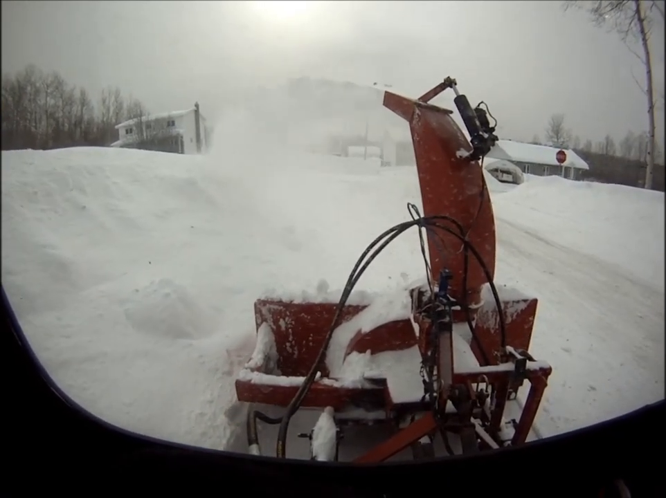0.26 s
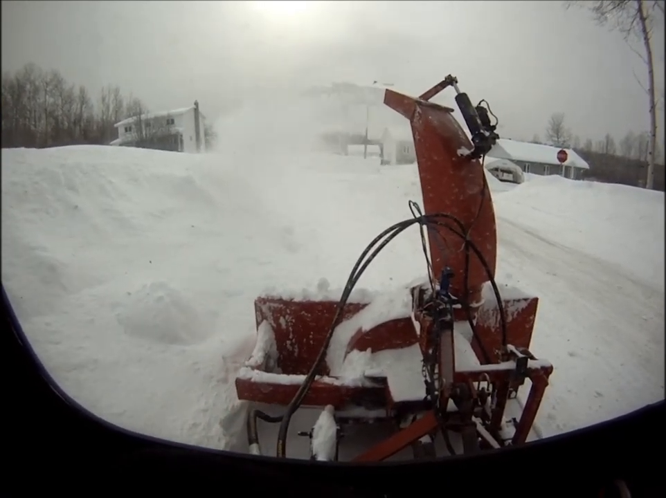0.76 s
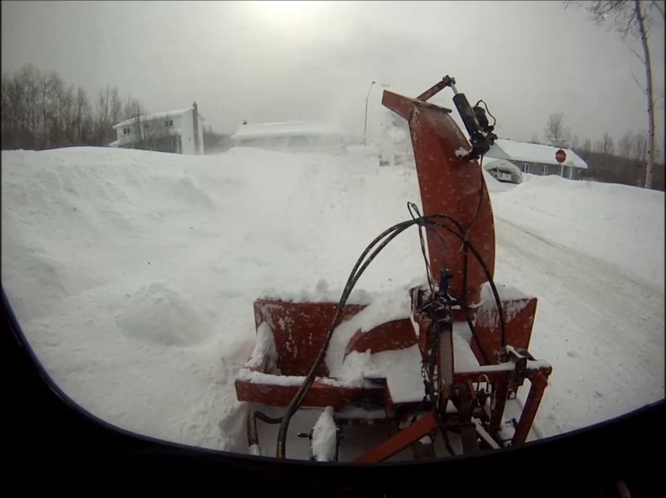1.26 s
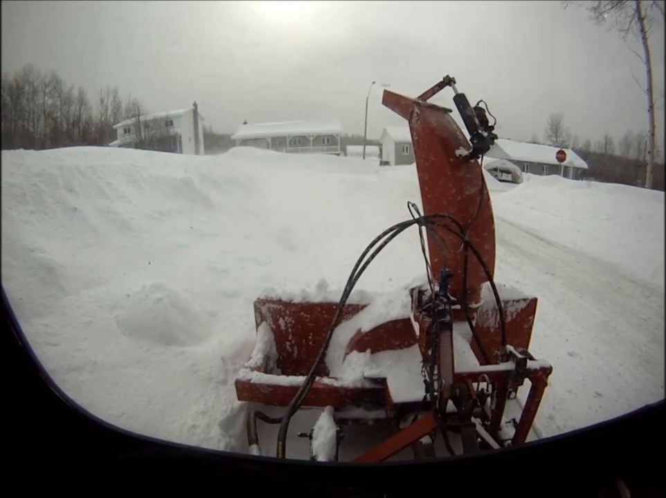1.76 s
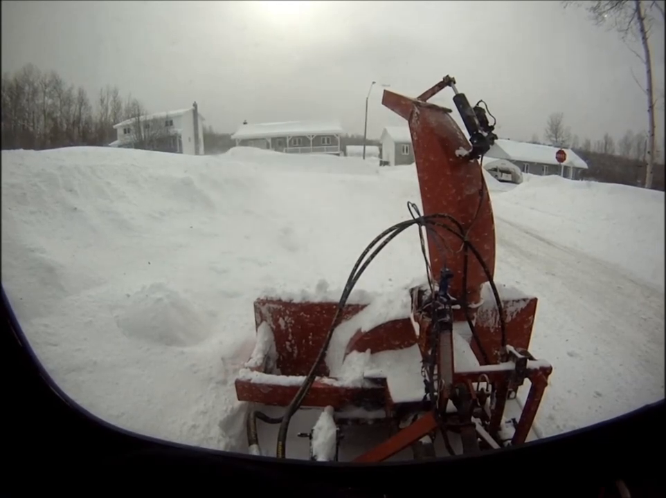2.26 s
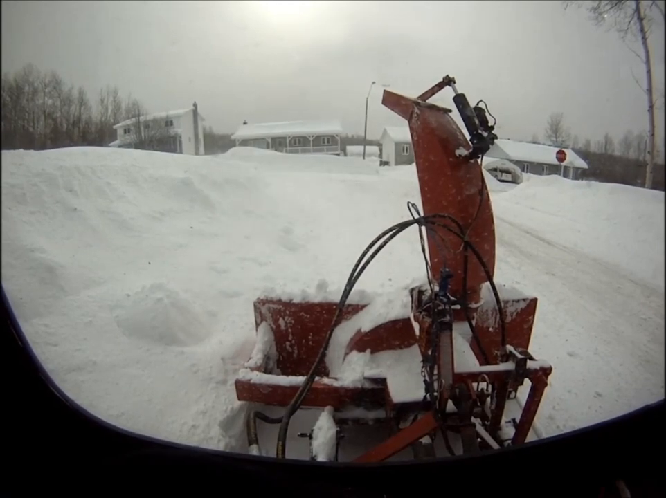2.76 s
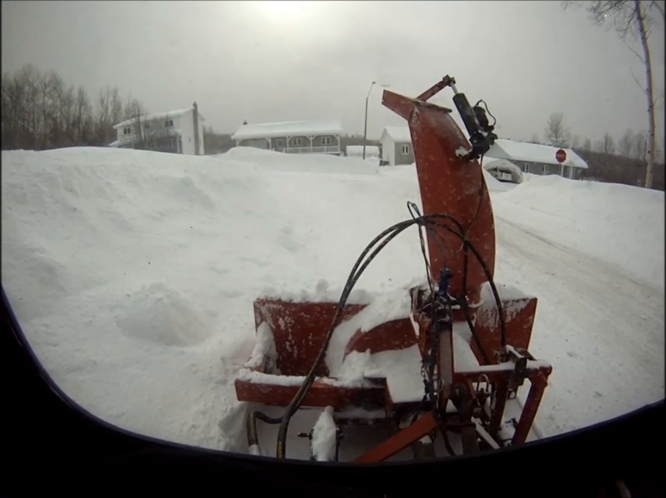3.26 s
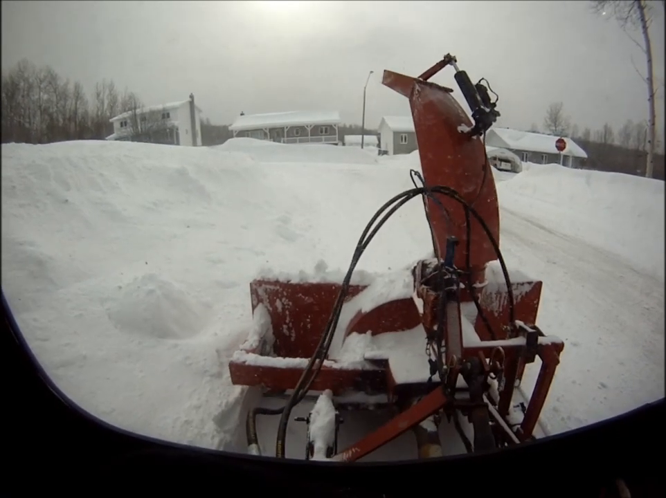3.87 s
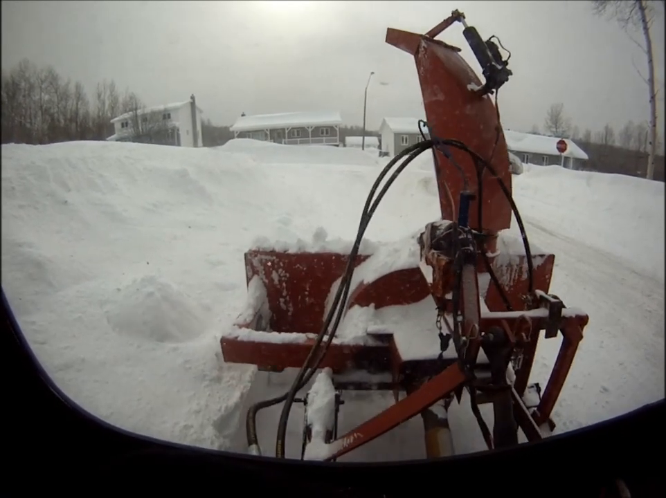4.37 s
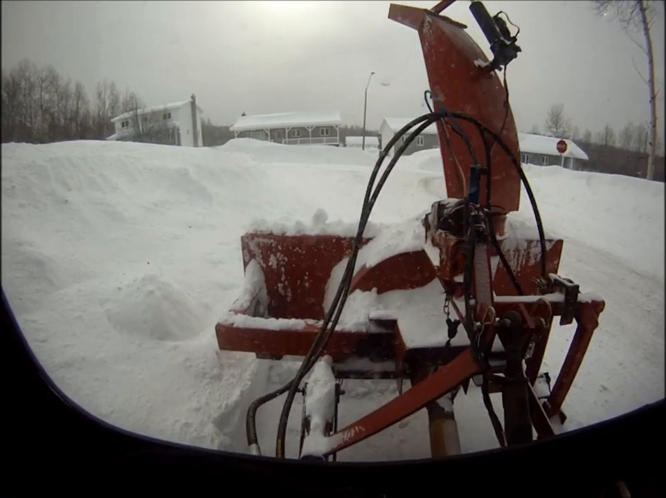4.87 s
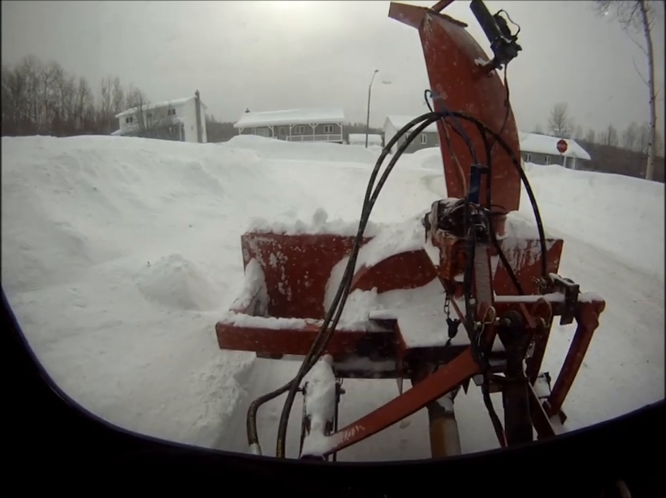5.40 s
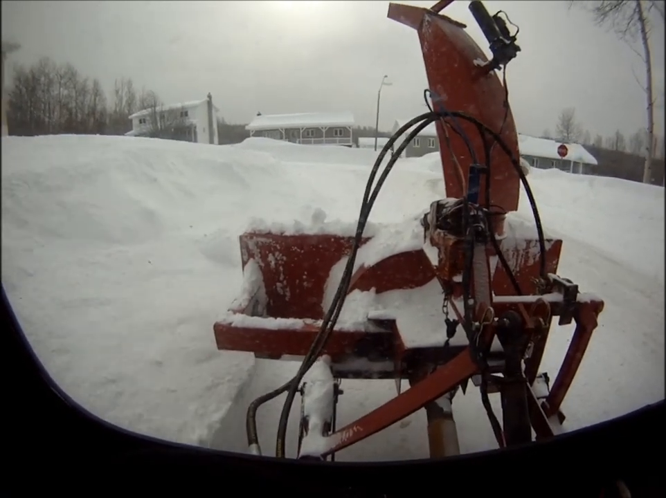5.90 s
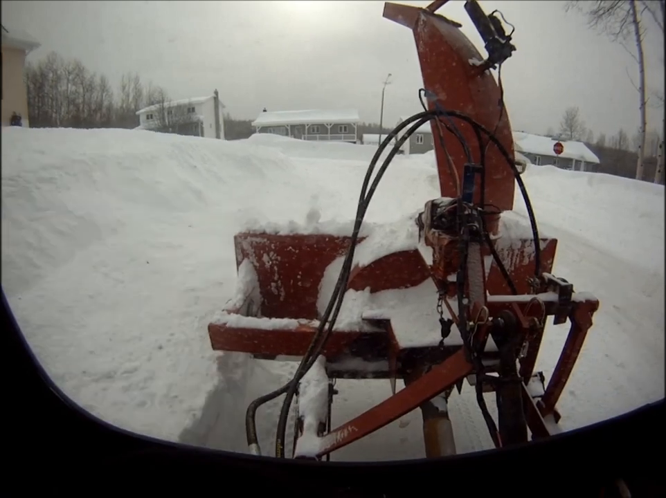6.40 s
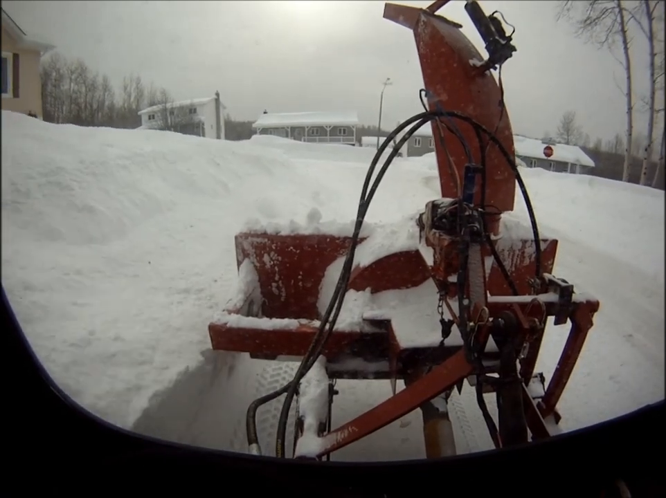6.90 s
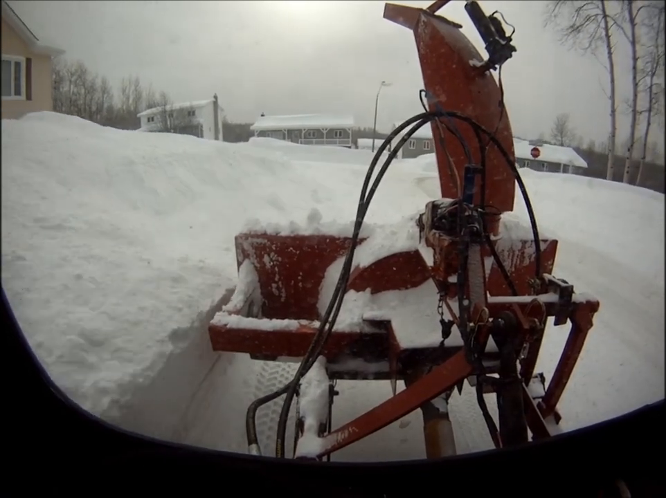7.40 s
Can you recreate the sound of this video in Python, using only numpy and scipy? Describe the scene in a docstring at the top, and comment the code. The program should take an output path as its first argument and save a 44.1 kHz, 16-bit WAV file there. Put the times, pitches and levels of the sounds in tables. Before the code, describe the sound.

Heard from the driver's seat of a compact three-cylinder diesel tractor with a snowblower, outdoors on a snowy street. At 0 s the engine throbs and knocks under a rough rumble and rattle as the auger throws its last snow, with brief whines; by 0.7 s this eases and the revs rise slightly. From 1 to 3.5 s it runs steadily, pump whining thinly, the housing drone swelling unevenly; a sharp double steel clank at 1.9 s, a faint tick at 2.8. From 3.5 to 4 s the pitch sags as the blower lifts, oil lines ringing; a jolt at 4.2. Around 4.9 to 5.4 s the engine lugs deepest, thumping and booming, with a wavering clutch squeal. At 5.5 to 5.7 s gears clash in a rough growl and bite into a bright whine, which settles and climbs with the revs, rolling steadily until 7.6 s. Close single microphone, gritty treble.

```python
"""On a snowy street, from the driver's seat of a three-cylinder compact diesel tractor working a snowblower.
The engine, built from sines at multiples of its cycle rate, throbs and knocks over the blower housing's drone.
It sags while the hydraulic pump lifts the blower; then the gears clash, bite and whine and the tractor rolls off.
Loose ironwork, noise bursts ringing steel, clanks once and ticks now and then. One microphone hears it all."""
import sys
import numpy as np
from scipy import signal
from scipy.fft import rfft, irfft, next_fast_len
from scipy.io import wavfile
from scipy.ndimage import uniform_filter1d

SR = 44100
rng = np.random.default_rng(int(sys.argv[2]) if len(sys.argv) > 2 else 0)


def pcm_store(signal):
    """Save signal as 16-bit PCM."""
    levels = np.round(np.clip(np.atleast_2d(signal), -1, 1) * 32767)
    wavfile.write(sys.argv[1], SR, levels.astype(np.int16).T)


N = 337365

# "Order" is a multiple of the four-stroke cycle rate; "turns" are turns of that cycle.
# crankshaft speed: (time [s], speed [rpm])
CRANK_SPEED = [(0.0, 2316), (0.26, 2303), (0.59, 2488), (0.83, 2507), (1.37, 2468), (2.38, 2507),
               (3.54, 2505), (3.94, 2335), (4.63, 2389), (5.17, 2172), (5.6, 2310), (5.75, 2442),
               (5.9, 2480), (6.1, 2556), (6.27, 2600), (6.65, 2586), (7.02, 2625), (7.65, 2631)]
# engine notes before the exhaust level: (order, standing [dB], lifting [dB], driving [dB])
ENGINE_ORDERS = [(4, -33.5, -40, -32.5), (5, -50, -36, -46), (6, -45, -39, -47), (7, -47, -47, -44),
                 (8, -30, -31, -39), (10, -29, -28, -30), (11, -46, -47, -36), (12, -32, -32, -29),
                 (13, -41, -37, -48), (14, -41, -40, -55), (15, -42, -44, -36), (16, -42, -46, -48),
                 (17, -43, -43, -48), (18, -43, -43, -40), (19, -48, -58, -45), (20, -50, -43, -45),
                 (24, -52, -47, -45), (25, -50, -50, -55), (26, -48, -51, -53), (27, -46, -44, -45),
                 (28, -50, -58, -50), (30, -52, -47, -48), (31, -45, -52, -44), (32, -47, -43, -50),
                 (33, -40, -39, -49), (34, -45, -40, -53), (36, -48, -44, -50)]
# boom at three times the firing rate: (time [s], level [dB])
BOOM_LEVEL = [(0, -56), (.45, -32.5), (3.1, -28.5), (4.0, -43), (4.45, -25.5), (4.8, -32.5), (5.0, -21),
              (5.4, -18.5), (5.72, -21.5), (5.9, -28.5), (7.65, -36)]

# blows of the firings: (place in cycle [turns], into side panel [dB], into injector pipes [dB])
CYLINDER_BLOWS = [(-.03, 2.5, 2.5), (.28, -1.5, -2), (.66, -12, 3.5)]
# what they ring, levels relative: (frequency [Hz], width [Hz], level [dB])
PANEL_MODES = [(1415, 34, -5), (1253, 90, -12.5)]
PIPE_MODES = [(2190, 87, 1), (2500, 120, -8), (2888, 50, -1.5), (3610, 120, 2)]
MOUNT_MODES = [(257, 44, 1), (366, 140, -6.5)]
# thump of the lugging engine on its mounts: (time [s], level [dB])
LUGGING_LEVEL = [(3.5, -60), (3.9, -38), (4.65, -45), (4.87, -27), (5.1, -36), (5.45, -47), (5.8, -67)]

# relative noise colour, low register to high: (frequency [Hz], density [dB per Hz])
RUMBLE_COLOUR = [(22, -25), (40, 2.5), (65, -4), (90, -2), (130, -10.5), (170, 0), (210, -1), (270, -3.5),
                 (340, -7.5), (420, -11), (500, -20.5)]
GROWL_COLOUR = [(440, -6), (540, -6.5), (600, -2), (660, -3), (710, 2), (780, -3), (860, -5.5),
                (920, -10.5), (1000, -14.5), (1100, -14)]
RATTLE_COLOUR = [(1000, -5.5), (1160, -10), (1260, 2.5), (1340, -6.5), (1430, 3), (1530, 0), (1680, -3),
                 (1850, -2), (2000, -8.5)]
CLATTER_COLOUR = [(2000, -3.5), (2300, -3.5), (2600, -2), (2800, -4), (3000, -0.5), (3300, -3), (3680, 1),
                  (4000, -3), (4400, -8.5), (5000, -12), (5900, -14), (6500, -16.5), (7000, -23.5),
                  (7400, -14)]
CLASH_COLOUR = [(1100, -10), (1500, 5), (1750, -4), (1950, -6), (2400, 5), (2700, -1), (3050, -1),
                (3400, 0)]
# jolts of the frame: (time [s], strength [0-1], length [s])
FRAME_JOLTS = [(0.508, 0, 0.065), (4.175, 0.9, 0.044), (4.91, 0.65, 0.059), (5.605, 0.8, 0.047)]
# rough drone of the blower housing, before its trim: (time [s], level [dB])
DRONE_LEVEL = [(0, -45), (.33, -39), (.5, -25.5), (.68, -34), (.9, -42), (1.1, -26.5), (1.35, -39),
               (1.8, -29), (2.08, -40), (2.28, -32.5), (2.58, -28), (2.72, -48), (3.6, -32.5), (3.9, -29),
               (4.2, -31.5), (4.75, -36), (5.3, -28), (5.5, -36), (7.65, -23)]

# gear meshes, before bite and housing: (order, level [dB], time it takes the load [s])
GEAR_MESHES = [(32, -31, 5.52), (39.7, -39, 5.59), (59.7, -54, 5.55), (63.9, -40, 5.5),
               (68.87, -34.5, 5.59), (86, -42.5, 5.72), (120.8, -44, 5.58)]
# pump overtones, before the housing: (order, standing [dB], driving [dB])
PUMP_OVERTONES = [(20.85, -45, -38), (31.27, -48, -50), (41.7, -48.5, -62), (52.12, -58, -51),
                  (62.55, -53, -65), (125.1, -52, -68)]
# housing resonances and dips that whines pass through: (frequency [Hz], width [Hz], lift [dB])
HOUSING_LIFT = [(704, 14, 4), (781, 47, 12), (855.2, 19.4, 5), (1230, 24, 4.5), (1324, 95, -9.5),
                (1421, 97, 10.5), (1720, 73, -9), (1822, 103, 8.5), (2490, 91, 3.5), (2554, 74, 6)]
# brief whines as the load shifts: (start [s], end [s], order, level [dB])
SHORT_WHINES = [(-.1, .22, 30.6, -34), (-.1, .3, 56.5, -45), (.01, .32, 83.6, -39),
                (.12, .28, 140.4, -39.5), (.32, .44, 146.5, -44), (.3, .64, 50.2, -48),
                (.42, .55, 125, -42.5), (3.45, 3.75, 125, -44), (5.55, 5.63, 78, -35),
                (5.56, 5.63, 100, -38.5), (5.62, 5.71, 104, -42), (5.57, 5.68, 131, -37),
                (5.54, 5.62, 157, -35), (5.61, 5.69, 160.5, -39), (5.63, 5.97, 60.1, -41)]
# clutch squeal at full slip: (frequency [Hz], width [Hz], level [dB])
SQUEAL_MODES = [(647.4, 38, -29), (1410, 180, -34), (2690, 430, -38.5)]
# oil lines at full lift: (frequency [Hz], width [Hz], level [dB])
OIL_LINE_MODES = [(1246, 25, -48.5), (1400, 32, -44.5), (1840, 37, -47.5), (2600, 50, -47), (3000, 56, -47),
                  (3676, 27, -43)]
# bursts into loose ironwork, relative: (time [s], level [dB], 60 dB decay [s])
IRON_KNOCKS = [(.3, -40, 0.06), (.436, -21, 0.012), (.595, -38, .09), (1.903, -13.5, 0.04),
               (1.9092, -11, 0.067), (1.9134, -28, 0.046), (1.922, -35, 0.14), (2.805, -34, 0.025),
               (4.17, -41, 0.18), (4.381, -36, 0.0078), (4.829, -43, 0.024)]
# ringing of the ironwork, relative: (frequency [Hz], width [Hz], level [dB])
IRON_MODES = [(1400, 390, -8), (2070, 150, -6.5), (2550, 310, -3), (3440, 400, 0), (4080, 210, 1.5),
              (5760, 850, -9.5), (6670, 870, -11)]

# jobs: the auger clears its last snow, the hydraulics raise the blower, the engine labours to get the
# tractor moving, the tractor rolls; then the clutch slips and the teeth clash: (time [s], share of full effort)
THROWING_EFFORT = [(.25, 0.97), (.72, 0.034)]
LIFTING_EFFORT = [(3.5, 0), (4.0, 0.94), (5.0, 1), (5.5, 0.016)]
LABOURING_EFFORT = [(4.85, 0.21), (5.35, 1), (5.6, 0.92), (6.25, 0.25)]
DRIVING_EFFORT = [(5.15, 0.021), (5.849, 0.95)]
CLUTCH_SLIP = [(5.05, 0.11), (5.3, 0.96), (5.55, 0.94), (5.7, 0.28)]
CLASH_EFFORT = [(5.3, 0), (5.5, 0.58), (5.59, 0.51), (5.7, 0.5), (6.1, 0.2)]
# part levels: (running free [dB], then added by throwing, lifting, labouring, driving [dB])
SHAKE_LEVELS = (-25, 1.5, -1.5, 0, -4)
EXHAUST_LEVELS = (2, -5, 0.5, -8.5, 0.4)  # added to each engine note
PANEL_LEVELS = (-46, 6, -3, -3, 10)
PIPE_LEVELS = (-46, 8, 3, -2, 5.5)
RUMBLE_LEVELS = (-33.5, 10.5, 2.5, 7, 4)
GROWL_LEVELS = (-40, 9, 2, 6.5, 7)
RATTLE_LEVELS = (-44.5, 7.5, -1, 4, 5)
CLATTER_LEVELS = (-36.5, 2.5, 0, -1, 2)

STRONG_FIRING_TURNS = .73  # where in the cycle the strongest cylinder fires
FIRING_DB, GOVERNED_RPM, SAG_DB_PER_RPM = -16.4, 2460, .0115
# the exhaust pipe smears each thump: the order that leaves on time, and the lag per squared order away from it
PIPE_ORDER, PIPE_SMEAR_TURNS = 10, .06
# no two cycles are quite alike, which unsettles the high orders most
FLUTTER_DB_PER_ORDER, WAVER_TURNS_PER_ORDER = .05, .001
ENGAGE_RISE_S, BITE_DB, SETTLE_S = 0.095, 5, 0.2
CAMERA_RATE_HZ, CUTOFF_HZ = 15000, 15800


def exhaust(cycle, rpm, driving):
    """One cylinder fires harder than the others, so the orders of the cycle line up loosely in one thump."""
    shake_db = effort_db(SHAKE_LEVELS)
    exhaust_db = effort_db(EXHAUST_LEVELS)
    boom_db = in_time(BOOM_LEVEL)
    lifting = in_time(LIFTING_EFFORT)
    # the firing note weakens as the engine is pulled below its governed speed
    firing_db = FIRING_DB - SAG_DB_PER_RPM * np.maximum(GOVERNED_RPM - rpm, 0)
    pipe_lag, scatter = .42, .007  # turns

    # the crank shakes the frame once a revolution, twice a cycle; the three firings give the main note
    out = from_db(shake_db + 0.48 * drift(4)) * tone(2 * cycle)
    out += from_db(firing_db + 0.41 * drift(3.3)) * tone(3 * cycle - pipe_lag)
    out += from_db(boom_db + .4 * drift(1.7)) * tone(9 * cycle - pipe_lag)
    for order, standing_db, lifting_db, driving_db in ENGINE_ORDERS:
        load_db = lifting * (lifting_db - standing_db) + driving * (driving_db - standing_db)
        flutter_db = FLUTTER_DB_PER_ORDER * order * drift(7)
        level_db = exhaust_db + standing_db + load_db + flutter_db
        lag = pipe_lag + PIPE_SMEAR_TURNS * (order - PIPE_ORDER) ** 2
        unsteady = cycle + scatter * rng.normal() + WAVER_TURNS_PER_ORDER * drift(8.5)
        out += from_db(level_db) * tone(order * unsteady - lag)
    return out


def diesel_knock(cycle):
    """The firings beat a side panel and tick in the injector pipes; under load the engine thumps on its mounts."""
    blows = np.array(CYLINDER_BLOWS)
    panel = knocking(cycle, blows[:, [0, 1]], PANEL_MODES, jitter_s=.00008, uneven_db=0.3)
    pipes = knocking(cycle, blows[:, [0, 2]], PIPE_MODES, jitter_s=.00004, uneven_db=1.0)
    # one thump a cycle, its strength varying from cycle to cycle
    thump = knocking(cycle, [(-.13, 0)], MOUNT_MODES, jitter_s=0.00027, uneven_db=5.0)
    out = from_db(effort_db(PANEL_LEVELS)) * panel
    out += from_db(effort_db(PIPE_LEVELS)) * pipes
    return out + from_db(in_time(LUGGING_LEVEL)) * thump


def machine(cycle, driving):
    """Body, blower housing, panels and engine block, each in its own register; a jolt stirs them all."""
    t = np.arange(N) / SR
    jolt = sum(strength * np.exp(-((t - s) / length) ** 2) for s, strength, length in FRAME_JOLTS)
    loose = 1 - driving  # load takes up the slack, and the once-a-cycle rattle fades

    def regular(free, rolling):
        """Share of the shaking that repeats with every cycle."""
        return np.interp(driving, [0, 1], [free, rolling])

    rumble = coloured(rng.standard_normal(N), RUMBLE_COLOUR)
    growl = shaken(cycle, GROWL_COLOUR, regular(.8, .5), throb_db=1.2 * loose, firing_db=-0.5,
                   lag=0.04, flicker_db=1.84, jitter_s=0.00007, uneven_db=1.0)
    rattle = shaken(cycle, RATTLE_COLOUR, regular(.92, .55), throb_db=2.0 * loose, firing_db=1.0,
                    lag=0.2, flicker_db=1.0, jitter_s=.00003, uneven_db=0.5)
    clatter = shaken(cycle, CLATTER_COLOUR, regular(.85, .45), throb_db=0.81 * loose, firing_db=0.46,
                     lag=0.13, flicker_db=1.0, jitter_s=.000012, uneven_db=1.0)
    out = from_db(effort_db(RUMBLE_LEVELS) + 2.8 * jolt) * rumble
    out += from_db(effort_db(GROWL_LEVELS) + 1.1 * jolt) * growl
    out += from_db(effort_db(RATTLE_LEVELS) + 4.7 * jolt) * rattle
    return out + from_db(effort_db(CLATTER_LEVELS) + 3.4 * jolt) * clatter


def drone(cycle, driving):
    """The housing is shaken into a rough hum that swells once a cycle; loose joints cap its swing."""
    hz, width_hz, evenness = 688, 85, 0.62
    force = excitation(cycle, regular=.6, jitter_s=.00005, uneven_db=1)
    hum = rms_one(resonance(resonance(force, hz, width_hz), hz, width_hz))
    swing = np.sqrt(np.maximum(uniform_filter1d(hum ** 2, size=400), 0) + .05)
    hum = rms_one(hum / swing ** evenness)
    trim_db = -4 - 15 * driving
    throb_db = -1.0 * tone(cycle - 0.027)
    return from_db(in_time(DRONE_LEVEL) + trim_db + throb_db) * hum


def gears(cycle, rpm):
    """Each mesh sets in as it takes the load, biting hardest at first and then settling."""
    out = np.zeros(N)
    for order, db, engage_s in GEAR_MESHES:
        since = np.maximum(np.arange(N) / SR - engage_s, 0)
        bite = from_db(BITE_DB * np.exp(-since / SETTLE_S))
        load = np.minimum(since / ENGAGE_RISE_S, 1) * bite
        out += load * whine(cycle, rpm, [(order, db)], twist=0.00049, waver=0.0011,
                            flutter_db=2.1, rough_db=0.66)
    return out


def clash(cycle):
    """As the gears take the load, the teeth hammer across their backlash in a rough growl, then fade to a remnant."""
    teeth = shaken(cycle, CLASH_COLOUR, regular=0.78, throb_db=0.5, firing_db=-1.5, lag=.1,
                   flicker_db=3.0, jitter_s=.00003, uneven_db=3.0)
    return from_db(-32) * in_time(CLASH_EFFORT) * teeth


def clutch():
    """Slipping plates rub the housing into a wavering squeal: noise through narrow resonances."""
    friction = rng.standard_normal(N)
    squeal = np.zeros(N)
    for hz, width, db in SQUEAL_MODES:
        squeal += from_db(db) * rms_one(resonance(resonance(friction, hz, width), hz, width))
    return in_time(CLUTCH_SLIP) * squeal


def ironwork():
    """Each knock is a short gritty burst that rings the steel."""
    t = np.arange(N) / SR
    force = np.zeros(N)
    for s, db, t60 in IRON_KNOCKS:
        force += (t >= s) * from_db(db - 60 * np.clip((t - s) / t60, 0, 4))
    grit = rng.standard_normal(N) * force
    out = np.zeros(N)
    for k, (hz, width, db) in enumerate(IRON_MODES):
        out += (-1) ** k * from_db(db) * resonance(grit, hz, width)
    return from_db(8.5) * out


def pump(cycle, rpm, driving):
    """The hydraulic pump whines at overtones tied to the engine speed, lower in level while it lifts."""
    overtones = []
    for order, standing_db, driving_db in PUMP_OVERTONES:
        overtones.append((order, standing_db + driving * (driving_db - standing_db)))
    tones = whine(cycle, rpm, overtones, twist=0.00013, waver=0.00049, flutter_db=2.5, rough_db=0.64)
    return from_db(-4.5 * in_time(LIFTING_EFFORT)) * tones


def hydraulics(cycle):
    """While the blower rises, pulsing oil forced through the lift valve rings the lines at fixed pitches."""
    flow = excitation(cycle, regular=0.6, jitter_s=.00002, uneven_db=0.5)
    lines = sum(from_db(db) * rms_one(resonance(flow, hz, width)) for hz, width, db in OIL_LINE_MODES)
    return in_time(LIFTING_EFFORT) * lines


def brief_whines(cycle):
    """Short-lived tones that follow the engine speed and throb with its cycle."""
    t = np.arange(N) / SR
    shaft = cycle + 0.0008 * drift(30)
    fade_s = .06
    out = np.zeros(N)
    for start, end, order, db in SHORT_WHINES:
        gate = np.clip(np.minimum(t - start, end - t) / fade_s + .5, 0, 1)
        level_db = db + 1.5 * drift(13) + 0.5 * tone(cycle)
        out += gate * from_db(level_db) * tone(order * shaft)
    return out


def whine(cycle, rpm, partials, twist, waver, flutter_db, rough_db):
    """Tones at multiples of the cycle rate swell or dip with the housing; the shaft twists every cycle."""
    shaft = cycle + twist * tone(cycle) + waver * drift(9.3)
    cycle_hz = rpm / 120  # two revolutions a cycle
    out = np.zeros(N)
    for order, db in partials:
        lift_db = np.zeros(N)
        for hz, width, top_db in HOUSING_LIFT:
            lift_db += top_db / (1 + (2 * (order * cycle_hz - hz) / width) ** 2)
        beat_db = rough_db * (tone(3 * cycle + rng.random()) + tone(4 * cycle + rng.random()))
        level_db = db + lift_db + flutter_db * drift(22.0) + beat_db
        out += from_db(level_db) * tone(order * shaft + rng.random())
    return out


def shaken(cycle, colour, regular, throb_db, firing_db, lag, flicker_db, jitter_s, uneven_db):
    """A part shaken by contacts and turbulence; its level moves once a cycle and with each firing."""
    force = excitation(cycle, regular, jitter_s, uneven_db)
    throb = throb_db * np.tanh(2 * tone(cycle - lag))
    swell_db = throb + firing_db * tone(3 * cycle) + flicker_db * drift(12.3)
    return coloured(force * from_db(swell_db), colour)


def knocking(cycle, blows, modes, jitter_s, uneven_db):
    """Blows at fixed crank angles, (turns, dB), ring a part's modes in every cycle; rms 1."""
    turns, db = np.transpose(blows)
    due = np.arange(170)[:, None] + turns
    size = from_db(db + uneven_db * rng.standard_normal(due.shape))
    clicks = strikes(cycle, due, size, jitter_s)
    ring = np.zeros(N)
    for k, (hz, width, mode_db) in enumerate(modes):
        ring += (-1) ** k * from_db(mode_db) * rms_one(resonance(clicks, hz, width))
    return rms_one(ring)


def excitation(cycle, regular, jitter_s, uneven_db):
    """Contacts that repeat with the cycle, mixed with turbulence."""
    repeating = np.sqrt(regular) * contacts(cycle, jitter_s, uneven_db)
    return repeating + np.sqrt(1 - regular) * rng.standard_normal(N)


def contacts(cycle, jitter_s, uneven_db, count=130):
    """Valves, injectors and teeth strike at the same crank angles in every cycle, never quite alike."""
    angles = (np.arange(count) + rng.random(count)) / count
    strength = rng.choice([-1, 1], count) * from_db(2.33 * rng.standard_normal(count))
    due = np.arange(-1, 170)[:, None] + angles
    size = strength * from_db(uneven_db * rng.standard_normal(due.shape))
    return rms_one(strikes(cycle, due, size, jitter_s))


def strikes(cycle, due, size, jitter_s):
    """Single-sample clicks where the cycle reaches each due turn, with a little timing jitter."""
    at = np.interp(due, cycle, np.arange(N), left=-SR, right=-SR)
    at = at + jitter_s * SR * rng.standard_normal(due.shape)
    heard = (at >= 0) & (at < N - 1)
    return np.bincount(np.round(at[heard]).astype(int), size[heard], N)


def effort_db(levels):
    """A part's level: each job that the machine is doing adds its own share."""
    free_db, *added_db = levels
    jobs = (THROWING_EFFORT, LIFTING_EFFORT, LABOURING_EFFORT, DRIVING_EFFORT)
    return free_db + sum(db * in_time(job) for db, job in zip(added_db, jobs))


def in_time(rows):
    """A (time, value) table as one value a sample."""
    s, values = np.transpose(rows)
    return np.interp(np.arange(N) / SR, s, values)


def drift(rate):
    """Slow chance with spread 1, drawn every 40 samples through a two-pole smoother."""
    r = np.exp(-80 * np.pi * rate / SR)
    chance = rng.standard_normal(N // 40 + 2002)
    slow = signal.lfilter([1], [1, -2 * r, r * r], chance)[2000:]  # drop the start-up
    return np.interp(np.arange(N) / 40, np.arange(len(slow)), rms_one(slow))


def coloured(x, colour):
    """Give x a spectrum that falls steeply beyond its ends; rms 1."""
    hz, db = np.transpose(colour)
    size = next_fast_len(N + 4096)
    octave = np.log2(np.maximum(np.arange(size // 2 + 1) * SR / size, 1))
    outside = np.abs(octave - np.clip(octave, np.log2(hz[0]), np.log2(hz[-1])))
    gain = from_db(np.interp(octave, np.log2(hz), db) - 90 * outside)  # 90 dB an octave
    return rms_one(irfft(rfft(x, size) * gain, size)[:N])


def resonance(x, hz, width_hz):
    """Two-pole band-pass with gain 1 on top."""
    r = np.exp(-np.pi * width_hz / SR)
    zeros = np.array([1, 0, -1]) * (1 - r * r) / 2
    poles = [1, -2 * r * np.cos(2 * np.pi * hz / SR), r * r]
    return signal.lfilter(zeros, poles, x + 1e-18)


def tone(turns):
    """A sine of rms 1 at a phase given in turns."""
    return np.sqrt(2) * np.cos(2 * np.pi * turns)


def from_db(db):
    """Decibels to gain."""
    return 10 ** (np.asarray(db) / 20)


def rms_one(x):
    """Scale to rms 1."""
    return x / np.sqrt(np.mean(x ** 2) + 1e-20)


def scene():
    """Body rumble, clutch rub and loose iron run free, the rest follows the crankshaft; one microphone, two channels."""
    rpm = in_time(CRANK_SPEED)
    cycle = np.cumsum(rpm / 120) / SR - STRONG_FIRING_TURNS
    driving = in_time(DRIVING_EFFORT)
    sound = exhaust(cycle, rpm, driving) + diesel_knock(cycle)
    sound += machine(cycle, driving) + drone(cycle, driving)
    sound += gears(cycle, rpm) + clash(cycle) + clutch() + ironwork()
    sound += pump(cycle, rpm, driving) + hydraulics(cycle) + brief_whines(cycle)
    return np.array([sound, sound])


def record(dry):
    """A small camera samples slowly and holds each value, which mirrors the sound into the top octave."""
    narrow = signal.sosfilt(signal.cheby2(14, 60, 8000, fs=SR, output="sos"), dry)
    mirrored = narrow * (1 + 2 * np.cos(2 * np.pi * CAMERA_RATE_HZ * np.arange(N) / SR))
    # holding puts a null at the sampling rate
    hold = np.array([1, -2 * np.cos(2 * np.pi * CAMERA_RATE_HZ / SR), 1])
    held = signal.lfilter(hold / hold.sum(), [1], mirrored)
    return signal.sosfilt(signal.ellip(12, .1, 80, CUTOFF_HZ, fs=SR, output="sos"), held)


dry = scene()
out = record(dry)
pcm_store(out)
```